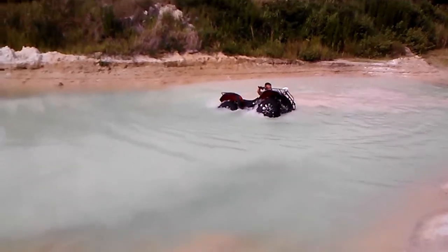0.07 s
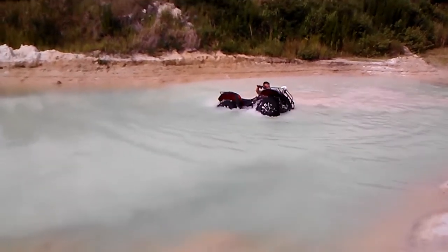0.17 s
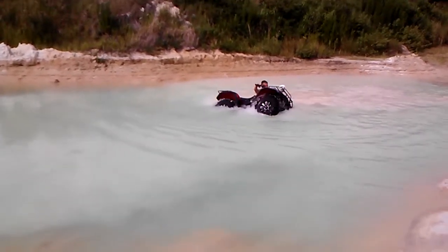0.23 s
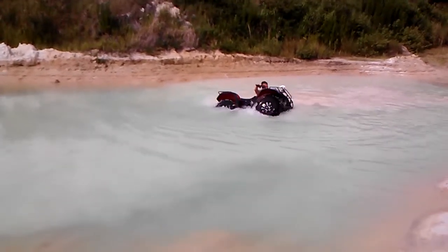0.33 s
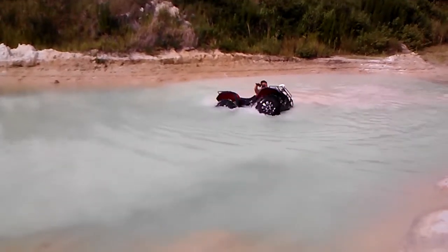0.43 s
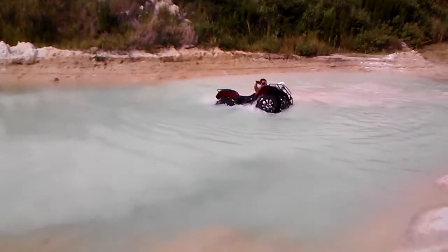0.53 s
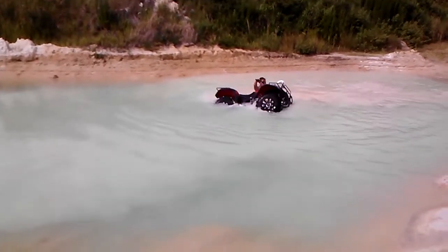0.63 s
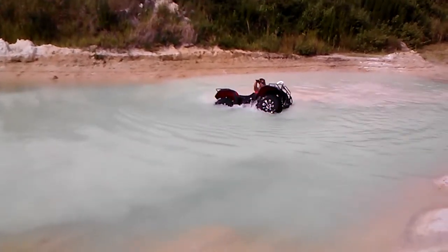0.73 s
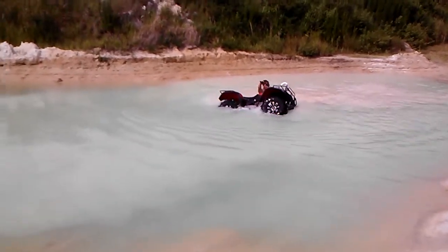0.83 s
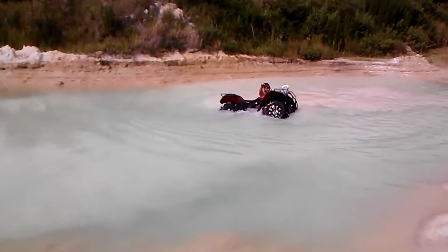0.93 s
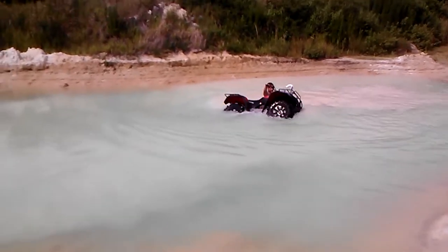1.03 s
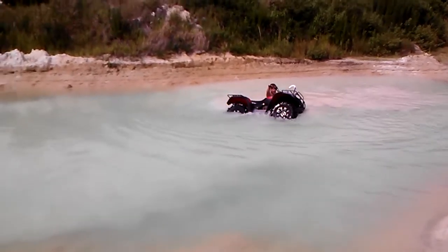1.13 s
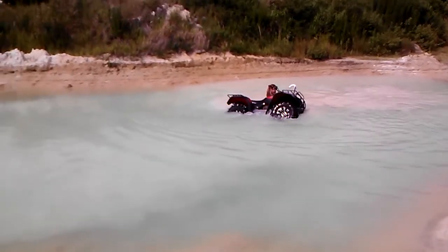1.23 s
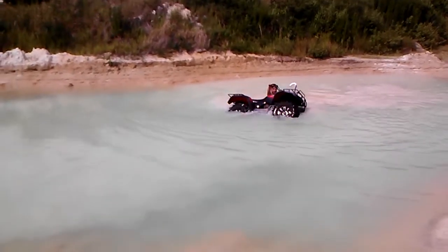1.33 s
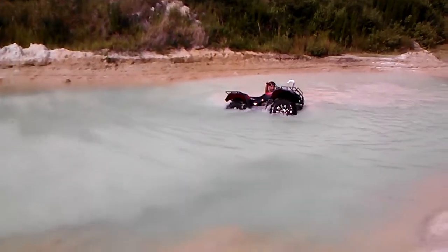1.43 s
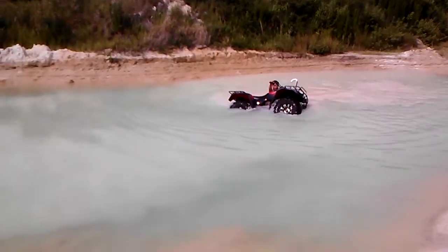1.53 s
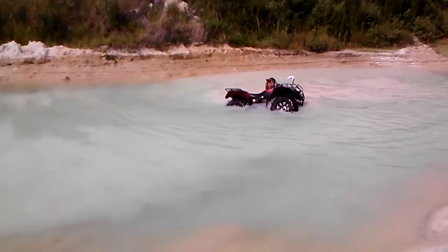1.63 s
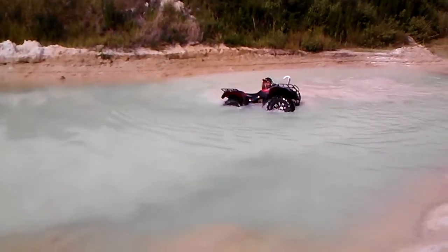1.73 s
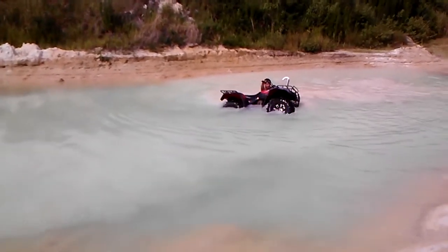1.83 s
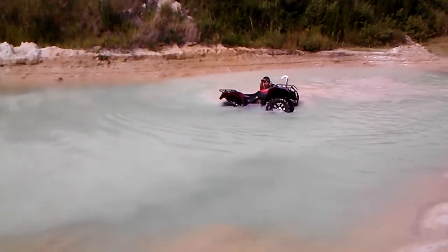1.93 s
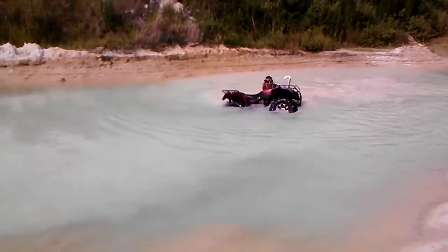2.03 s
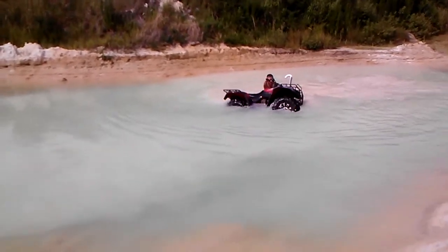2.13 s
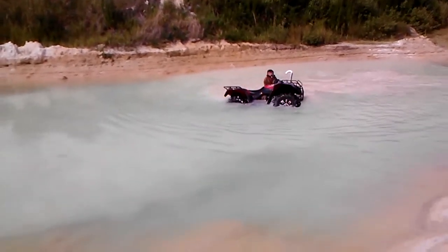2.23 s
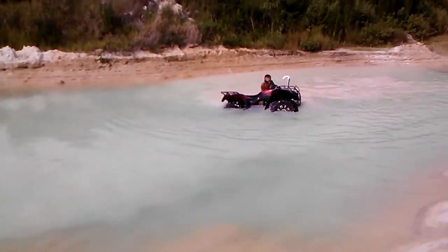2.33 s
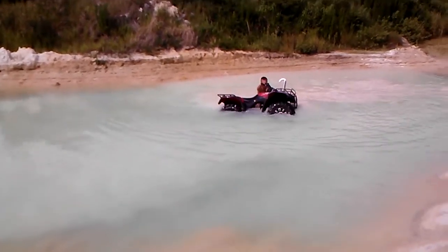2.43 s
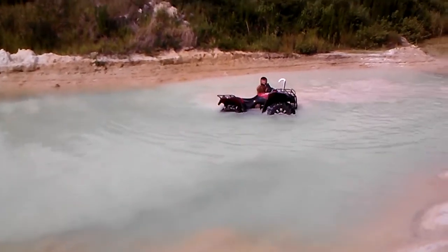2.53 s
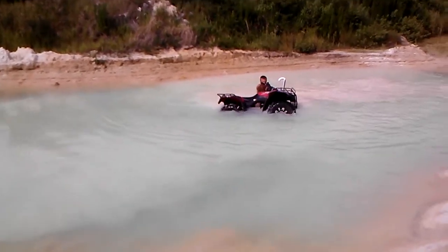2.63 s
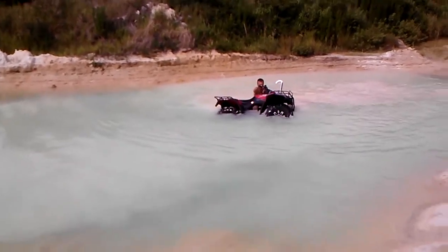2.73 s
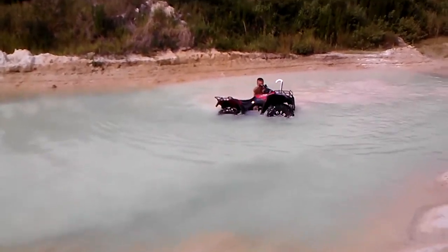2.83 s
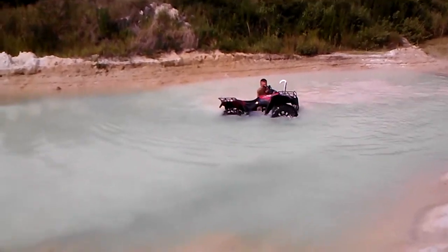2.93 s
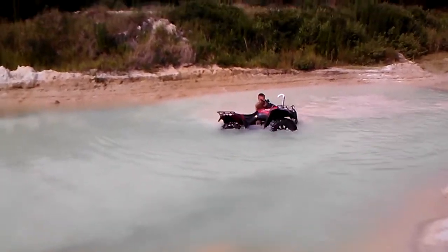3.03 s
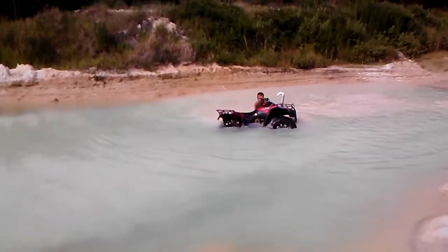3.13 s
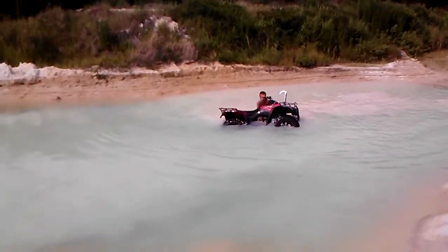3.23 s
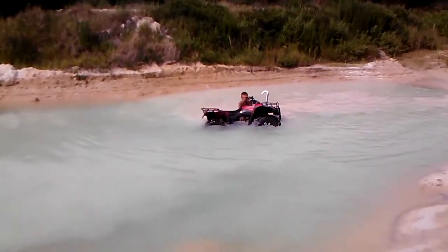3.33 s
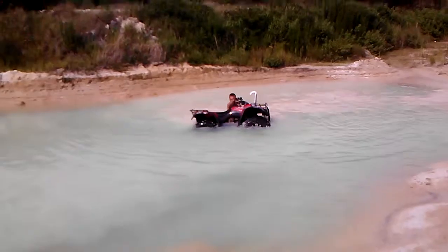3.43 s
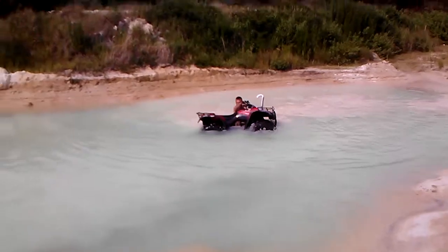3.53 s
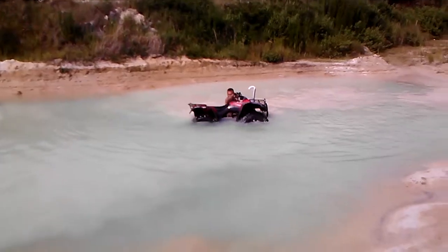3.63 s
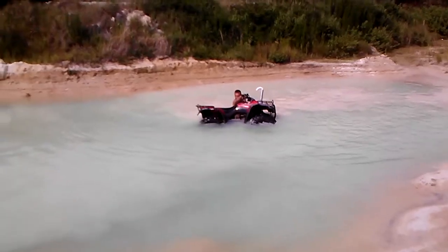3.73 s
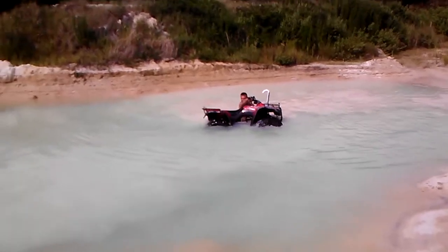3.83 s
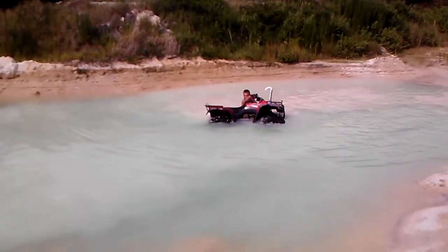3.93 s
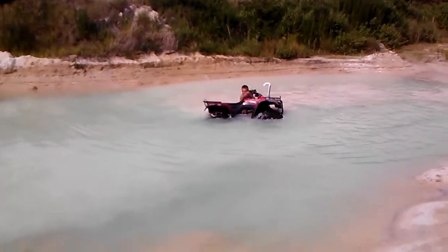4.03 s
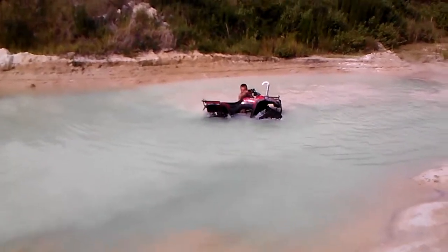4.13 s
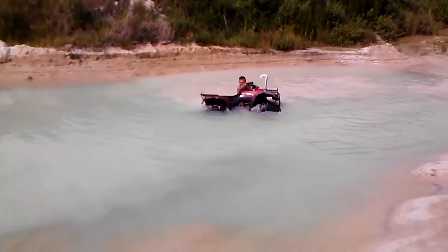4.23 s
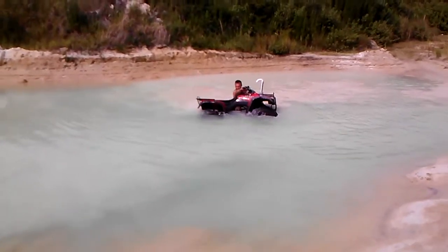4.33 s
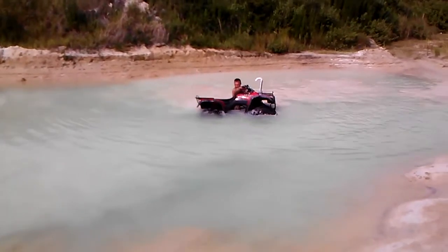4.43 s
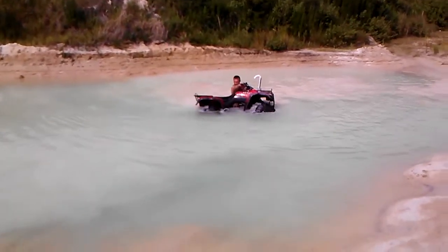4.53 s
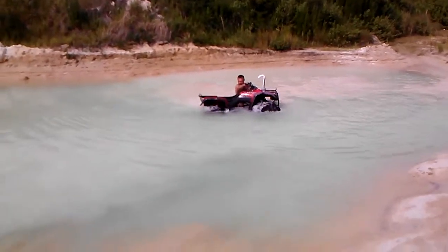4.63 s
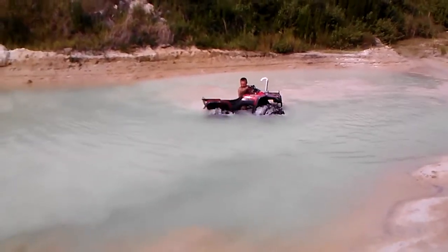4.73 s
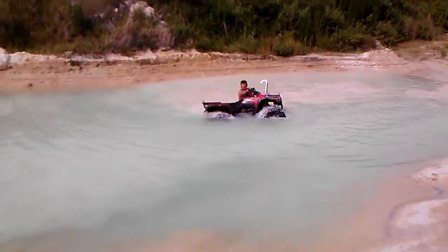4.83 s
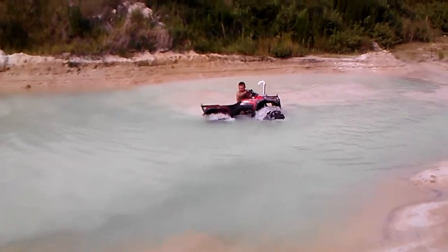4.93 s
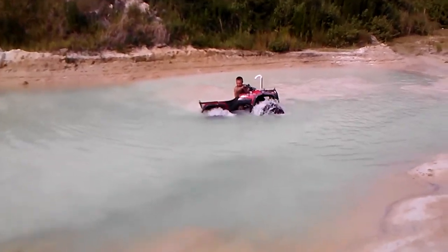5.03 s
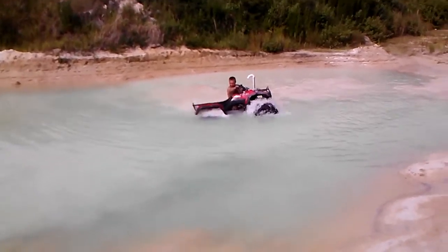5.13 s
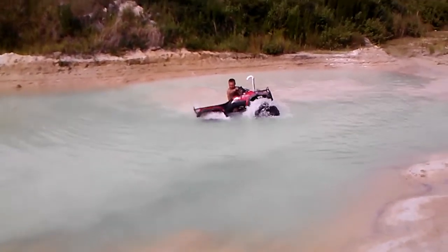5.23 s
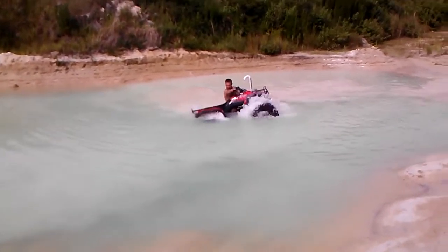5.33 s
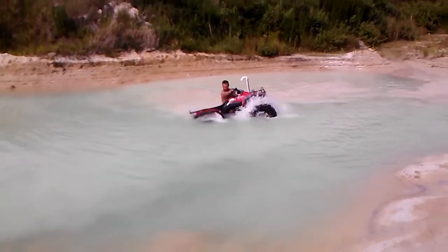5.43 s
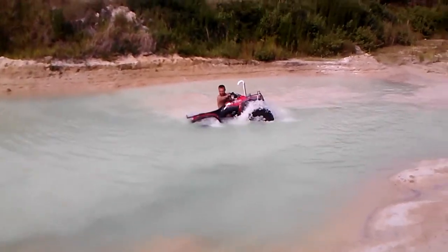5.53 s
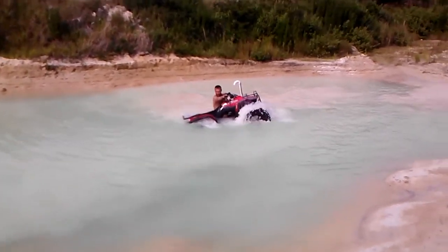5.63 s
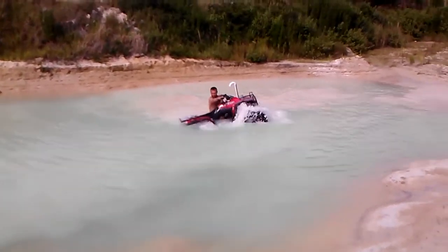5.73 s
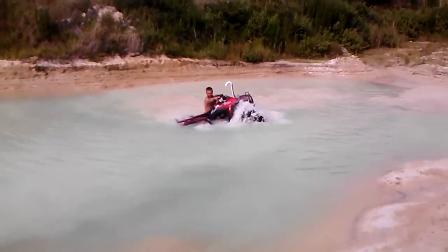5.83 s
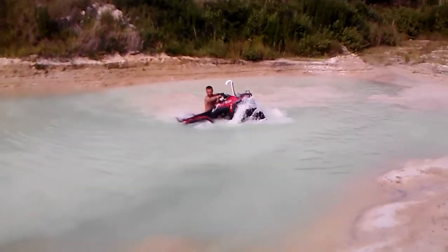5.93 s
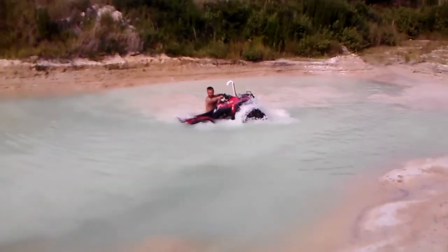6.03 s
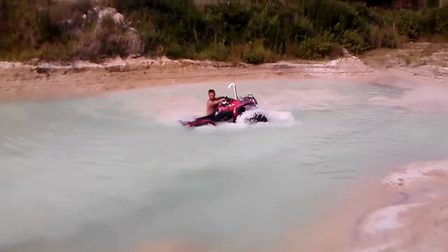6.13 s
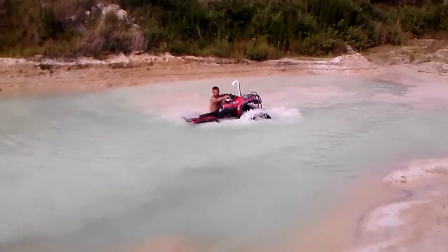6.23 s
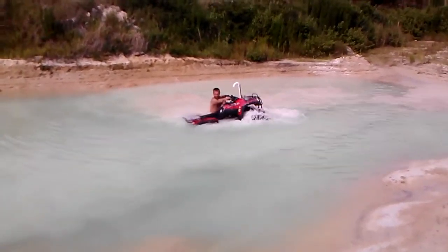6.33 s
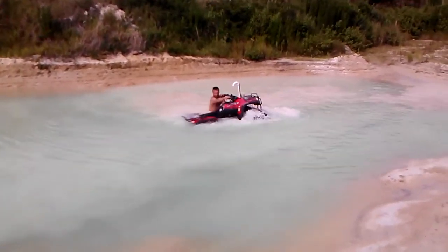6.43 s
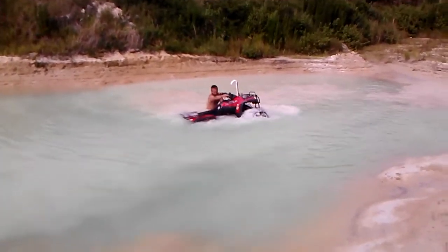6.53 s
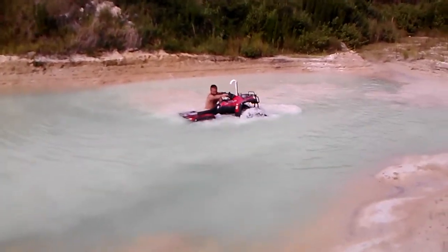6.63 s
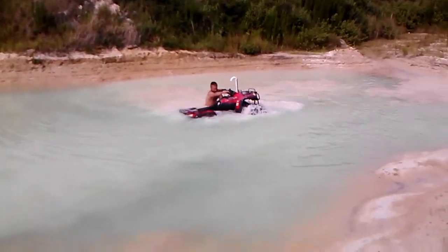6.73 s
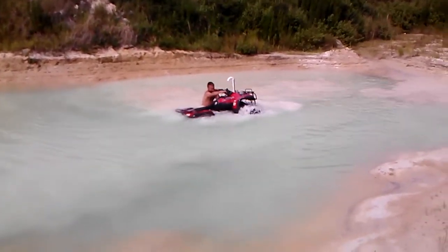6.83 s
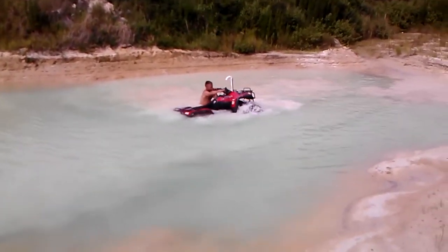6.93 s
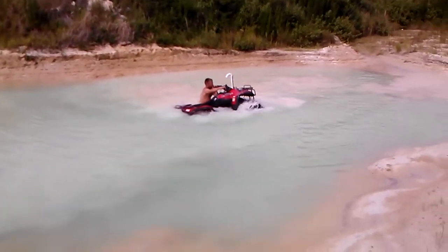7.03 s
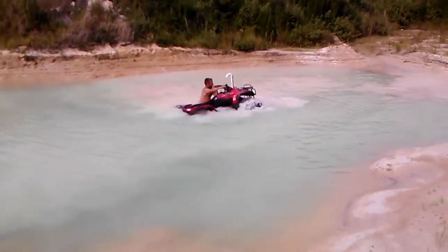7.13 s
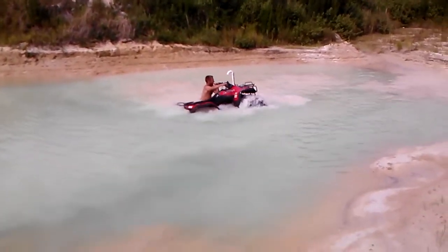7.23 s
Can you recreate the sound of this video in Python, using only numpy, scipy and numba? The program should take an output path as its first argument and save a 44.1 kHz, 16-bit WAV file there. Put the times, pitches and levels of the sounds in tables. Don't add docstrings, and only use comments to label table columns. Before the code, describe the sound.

A quad bike sits in a pond some way from a small microphone on the bank. From 0 to 0.5 s, heavy low wind thumps dominate, hardest near 0.4 s, over a dull, irregular underwater idle of about sixteen firings per second and soft churning. Another thump comes near 0.8 s. From 1.5 to 3.8 s the engine is fainter and slows slightly; small hollow slaps, splashes and crisp drips stand out. Around 4 s wind returns and the engine picks up. A sharp slap at 4.6 s opens the first rev, climbing to a barking, rasping peak near 5.1 s with thin belt whine, panel rattle and loud foaming spray. It dips near 5.35 s, then revs again to about 5.6 s. From 5.9 s speed and wash ease into a lower growl, with a wind thump near 6.7 s, hollow slaps near 7 s, and engine effort rising before the end at 7.3 s.

```python
import sys
import numpy as np
from scipy import signal
from scipy.fft import rfft, irfft
from scipy.io import wavfile
from scipy.ndimage import uniform_filter1d
from numba import njit

SR = 44100
rng = np.random.default_rng(int(sys.argv[2]) if len(sys.argv) > 2 else 0)


def log_audio(samples):
    frames = np.atleast_2d(samples).T
    limited = np.clip(frames, -1, 1)
    pcm = np.round(limited * 32767).astype(np.int16)
    wavfile.write(sys.argv[1], SR, pcm)


def rack_gain(trim_db):
    fader = np.asarray(trim_db, float)
    return 10 ** (fader / 20)


N = 320607
T = np.arange(N) / SR

# t/s, firing rate f/Hz
FIRING_RATE = [(0, 16.4), (1.45, 17.6), (2.05, 15.8), (3.05, 14.35), (3.7, 14.35), (3.89, 16.1),
               (4.29, 18.4), (4.45, 29.3), (4.62, 31.6), (4.74, 34.3), (4.82, 40), (5.06, 50.9),
               (5.17, 53.8), (5.36, 41.5), (5.6, 52.8), (5.65, 51.5), (5.9, 37), (6.13, 36.8), (6.3, 32.8),
               (6.46, 32), (6.55, 30), (6.93, 33.4), (7.05, 36), (7.27, 37.4)]
# t/s, effort level/dB under full, thud of the drowned exhaust level/dB
THROTTLE = [(0, -21, -38), (1.0, -28, -38.5), (1.6, -41, -53.5), (2.2, -28, -41), (3.7, -22, -45.5),
            (4.1, -23, -50), (4.4, -17.5, -60.5), (4.6, -15.5, -35.5), (4.612, -6.5, -35.5),
            (4.8, -4.5, -42), (4.9, -4, -38), (5.1, -9.5, -30.5), (5.2, -9, -48.5), (5.35, -4.5, -58.5),
            (5.55, -2.5, -46), (5.7, -7.5, -51), (6.0, -11.5, -45.5), (6.6, -12, -48.5), (7.0, -15.5, -45),
            (7.27, -5.5, -41.5)]
# f/Hz, width/Hz, level/dB
PIPE_MODES = [
    (131, 158, -0.5),
    (201, 80, 0),
    (316.5, 107, -1.5),
    (347, 38, -4.5),
    (400, 43, -10),
]
# f/Hz, width/Hz, level/dB
PANEL_MODES = [(980, 120, 3), (1200, 73, 11.5), (1556, 27, 7), (2120, 64, -34), (2820, 120, -26),
               (3040, 60, -21.5), (3930, 86, -9), (4720, 230, -24.5), (5270, 150, -16), (6420, 110, -23.5),
               (8410, 240, -74.5)]
# t/s, churn level/dB, spray level/dB
WHEEL_WASH = [(0, -35.5, -42), (0.75, -38, -44.5), (1.09, -42, -47.5), (1.15, -36, -45.5),
              (1.62, -37.5, -44), (2.1, -44.5, -51), (2.33, -44, -51), (2.5, -42.5, -53), (2.6, -42, -50),
              (3.8, -41.5, -48.5), (3.97, -37, -48.5), (4.46, -35, -44), (4.6, -32, -42), (4.612, -30, -41),
              (4.8, -26, -35.5), (5.1, -23, -31), (5.22, -27, -32.5), (5.43, -28.5, -36.5),
              (5.57, -25, -32), (5.8, -28, -34.5), (6.44, -34, -44.5), (7.27, -31.5, -44)]
# f/Hz, level/dB
CHURN_TONE = [(110, -33), (180, -6), (269, 2.5), (341, -8), (433, -0.5), (499, -10), (568, -4.5), (839, 2),
              (1080, -3.5), (1700, -2), (1970, -16), (2150, -21), (2400, -19.5), (3120, -41), (5280, -120)]
# f/Hz, level/dB
SPRAY_TONE = [(820, -16), (1400, -2), (1750, 2), (1970, -9.5), (2160, -7.5), (2440, -13.5), (2800, -11.5),
              (3320, -14), (3580, -13.5), (4040, -13), (5510, -9), (7280, -17.5), (8090, -36),
              (9000, -29.5), (9840, -47), (12800, -81), (21600, -120)]
# peak t/s, churn level/dB, froth level/dB, length/s
BREAKING_WAVES = [(0.0, -41, -39, 0.027), (0.22, -56, -53.5, 0.086), (1.29, -54, -43, 0.016),
                  (2.04, -44, -40.5, 0.0078), (2.15, -53, -42.5, 0.012), (2.26, -60, -47.5, 0.019),
                  (2.55, -52, -41.5, 0.018), (2.69, -66, -48.5, 0.012), (2.765, -37.5, -46, 0.014),
                  (2.81, -71, -51.5, 0.018), (2.87, -47, -37.5, 0.011), (3.06, -41.5, -42, 0.013),
                  (3.28, -54, -41.5, 0.06), (3.52, -43, -54, 0.022), (3.93, -41.5, -51.5, 0.054),
                  (4.15, -57, -49, 0.0048), (4.21, -60, -40.5, 0.0042), (5.03, -36, -47.5, 0.0081),
                  (5.73, -55, -48, 0.036), (6.76, -55, -76, 0.044), (7.11, -61, -59, .03)]
# t/s, peak level/dB
TINY_DROPS = [(0.0904, -55), (0.8067, -51), (0.9684, -55), (1.0282, -55), (1.2762, -47), (1.4423, -51),
              (1.997, -49), (2.172, -49), (2.5173, -55), (2.7434, -48), (2.866, -50), (3.0451, -54),
              (3.0985, -58), (3.2108, -45), (3.2327, -50), (3.6243, -56), (3.7485, -53), (3.8443, -50.5),
              (3.8718, -53), (3.9266, -54), (3.997, -50), (4.0588, -48), (4.3212, -46), (4.3623, -41.5)]
# peak t/s, rumble level/dB, rise/s, fall/s
GUSTS = [(.17, -26.5, 0.09, .08), (.285, -17.5, 0.016, 0.029), (.388, -23.5, 0.0056, 0.042),
         (.45, -35, 0.04, 0.18), (.78, -23, 0.0097, 0.1), (1.01, -30.5, 0.019, 0.13),
         (1.36, -39.5, .02, 0.082), (1.7, -47, 0.028, 0.032), (6.12, -34, 0.051, 0.057),
         (1.8, -31.5, 0.01, 0.022), (1.9, -40, 0.023, 0.019), (2.152, -31, 0.072, 0.054),
         (3.986, -24.5, 0.047, 0.082), (4.27, -30.5, 0.015, 0.11), (4.44, -27, 0.07, 0.16),
         (5.25, -32, 0.14, 0.078), (5.64, -33, 0.11, .15), (6.92, -24.5, 0.034, 0.066),
         (7.1, -25.5, 0.057, 0.18), (7.27, -23, 0.093, .1)]
# t/s, peak level/dB, pitch f/Hz, length/cycles
WIND_THUMPS = [(0.154, -14.5, 150, 0.95), (0.2655, -7, 167, 0.8), (0.276, -6.5, 195, 0.27),
               (0.3, -17, 170, 0.55), (0.258, -14, 170, .4), (0.3768, -0.5, 162, 0.55),
               (0.776, -9.5, 167, 0.72), (6.67, -5.5, 141, 0.29), (4.859, -12, 190, 0.39),
               (4.885, -15, 188, .7), (4.719, -17.5, 202, 0.84), (0.867, -16.5, 101, 0.62),
               (2.14, -14, 88, 0.59), (2.649, -23, 207, 0.98), (2.716, -30, 228, 0.94),
               (2.923, -29, 175, 0.97), (3.263, -27.5, 191, 0.53), (3.334, -28.5, 104, 0.33),
               (3.744, -25, 177, 1.2), (3.871, -22, 105, 0.78), (3.978, -20.5, 120, 0.55),
               (4.248, -19, 143, 0.43), (4.269, -21, 117, 0.5), (4.397, -17, 152, 1),
               (4.421, -18.5, 183, 0.78), (7.128, -14, 108, 2)]
# t/s, peak
# level/dB, pitch f/Hz
HULL_SLAPS = [(0.514, -22, 885), (0.579, -30, 683), (0.634, -22, 814), (1.686, -22.5, 606),
              (2.462, -31, 840), (2.145, -28, 1910), (2.665, -21.5, 775), (2.675, -19.5, 1900),
              (2.866, -25, 1700), (2.744, -22, 990), (2.7445, -18.5, 1520), (2.764, -32, 864),
              (2.959, -26, 965), (3.058, -23, 1230), (3.099, -26, 876), (3.165, -25, 670),
              (3.384, -24, 1580), (0.1646, -23, 890), (1.1748, -24, 850), (6.6, -28, 910),
              (3.503, -24, 840), (4.608, -13, 1120), (6.968, -18.5, 860), (7.019, -19, 1080),
              (3.981, -21, 945), (4.208, -23, 1600), (5.139, -14, 1170), (5.156, -16, 1050),
              (5.705, -21.5, 6700)]
# t/s, peak level/dB, brightest f/Hz
SPLASH_EVENTS = [(0.193, -23.5, 2770), (0.2454, -27.5, 2820), (0.4005, -20.5, 2310), (0.615, -21.5, 2400),
                 (0.9686, -27.5, 4870), (1.3387, -23.5, 2880), (1.464, -26, 3080), (1.5948, -30, 2350),
                 (1.624, -23.5, 2790), (2.0375, -36, 2850), (2.282, -33.5, 5200), (2.514, -29.5, 3930),
                 (2.677, -23, 2200), (2.7424, -30.5, 2790), (2.8635, -37, 6050), (2.9645, -30, 4720),
                 (3.048, -26, 5560), (3.2116, -25, 4930), (3.2825, -29, 2650), (3.3845, -34.5, 4600),
                 (3.5048, -35, 4960), (3.6253, -28.5, 5400), (3.7437, -23, 2670), (3.934, -26.5, 3870),
                 (4.0316, -26.5, 5370), (4.145, -22, 5700), (4.605, -25, 4320), (5.0655, -20, 4140),
                 (6.16, -20.5, 5560), (6.967, -24, 1510)]
# t/s, peak level/dB, brightest f/Hz
DROP_HITS = [(1.8148, -31, 2190), (1.932, -30.5, 2830), (2.0454, -30, 2200), (2.0837, -41.5, 5980),
             (2.1296, -37, 2990), (2.1416, -29.5, 2400), (2.171, -41, 2970), (2.2136, -35, 2190),
             (2.2494, -35, 4660), (2.2835, -29.5, 2830), (2.3357, -47, 2690), (2.361, -35, 3310),
             (2.41, -39, 2890), (2.4343, -38, 3460), (2.498, -40.5, 3810), (2.519, -34, 5500),
             (2.5551, -35, 2040), (2.646, -34, 4870), (2.7437, -31, 5030), (2.7607, -34.5, 2010),
             (2.7814, -29, 4030), (2.8659, -33, 2150), (2.9971, -33.5, 2170), (2.553, -39.5, 5100),
             (3.176, -33.5, 4000), (3.575, -34, 5500), (2.812, -36, 4500), (3.147, -34, 4000),
             (3.011, -26.5, 3720), (3.099, -37.5, 3930), (3.164, -30, 2860), (3.2114, -25.5, 4900),
             (3.2321, -27.5, 3500), (3.2638, -30.5, 2220), (3.3032, -25.5, 3410), (3.398, -30, 5430),
             (3.4426, -36.5, 4000), (3.487, -33.5, 4500), (3.5284, -37, 2860), (3.572, -34, 2350),
             (3.693, -31, 5040), (3.8015, -35, 4430), (3.8722, -32.5, 2230), (3.9577, -23.5, 2030),
             (3.9804, -34, 2030), (4.07, -32.5, 2150), (4.1034, -37, 5330), (4.6077, -30, 4550),
             (5.029, -23.5, 4000)]
# peak t/s, level/dB, rise/s, fall/s
SECOND_ORDER_SWELLS = [
    (4.815, -20.5, 0.03, 0.05),
    (5.03, -30, .05, .05),
    (5.13, -24, 0.075, 0.036),
    (5.92, -30.5, 0.13, 0.073),
    (6.75, -27, 0.23, 0.069),
    (7.15, -32.5, .12, .6),
]
# peak t/s, level/dB, rise/s, fall/s
FOURTH_ORDER_SWELLS = [
    (4.88, -37, 0.43, 0.12),
    (5.62, -29.5, 0.022, 0.085),
    (5.97, -32.5, 0.084, 0.13),
    (6.14, -36.5, 0.084, 0.13),
    (6.97, -40, 0.049, 0.28),
    (7.27, -26.5, 0.18, .1),
]
# order, peak t/s, level/dB, rise/s, fall/s
MIXED_ORDER_SWELLS = [(6, 4.7, -31, .06, .05), (5, 4.885, -29, .03, .03), (3, 5.07, -34, .06, .06),
                      (6, 5.09, -34, .12, .05), (7, 5.04, -35, .12, .06), (8, 5.05, -33, .14, .07),
                      (9, 4.88, -35, .08, .05), (6, 4.9, -33, .07, .06), (3, 4.87, -30, .05, .04),
                      (7, 5.38, -33, .05, .03), (5, 5.42, -28, .04, .03), (7, 5.5, -31, .05, .06),
                      (6, 5.5, -34, .04, .04), (2, 5.58, -34, .1, .06), (4, 5.06, -35, .1, .1),
                      (5, 5.0, -35, .08, .08), (6, 4.64, -34, .04, .05), (3, 4.68, -34, .08, .06),
                      (4, 4.4, -33, .04, .08), (4, 4.74, -32, .05, .05), (5, 4.74, -33, .05, .04),
                      (4, 5.52, -39, .1, .06), (7, 5.76, -37, .06, .06), (6, 5.7, -38, .05, .06),
                      (8, 6.25, -39, .08, .1), (4, 6.45, -38, .12, .1), (4, 4.52, -34, .06, .05),
                      (4, 5.78, -38, .06, .08), (4, 6.95, -32, .04, .1), (2, 5.76, -39, .05, .08)]
# t/s, level/dB, f/Hz
BELT_WHINE = [(4.85, -70, 3800), (4.95, -37, 3820), (5.01, -34, 3980), (5.07, -34, 4070), (5.12, -34, 4020),
              (5.19, -37, 4030), (5.3, -62, 3950), (5.54, -70, 3320), (5.65, -41, 3200), (5.71, -39, 3150),
              (5.78, -42, 3120), (5.88, -70, 3030)]
# t/s, peak level/dB
PANEL_RASPS = [(4.945, -17), (4.9669, -11), (5.0092, -9), (5.029, -6), (5.049, -8), (5.0686, -14),
               (5.107, -6.5), (5.122, -10.5), (5.4326, -18), (5.45, -15), (5.4795, -13.5), (5.498, -13.5),
               (5.517, -16), (5.534, -16), (5.552, -11.5), (5.57, -9.5), (5.5887, -10), (5.608, -14.5)]
# t/s, f/Hz, depth/0-1
POND_BOUNCE = [(0, 2770, 0.03), (2.05, 3000, 0.1), (2.11, 3150, .8), (2.2, 3540, 0.8), (2.31, 4250, .8),
               (2.5, 4380, 0.7), (2.53, 2600, 0.6), (2.6, 2600, .5), (2.63, 3260, 0.5), (3.18, 3280, 0.5),
               (3.22, 3300, 0), (3.33, 3500, 0.1), (3.37, 3500, 0.8), (4.5, 3560, 0.6), (7.27, 3550, 0.88)]
# t/s, dip of a dull band/0-1, lift of a bright band/0-1
BIKE_TURN = [
    (0, 0.69, 0),
    (2.4, 0.65, 0),
    (3.8, 0.18, 0),
    (4.4, 0.13, 0),
    (5.0, 0, 0),
    (6.0, 0.03, 0),
    (7.27, 0.22, 0.6),
]
# f/Hz, width/Hz, gain
SIDE_ON_BANDS = [
    (2150, 200, .5),
    (2480, 200, -.4),
    (2850, 300, .4),
    (4600, 250, .3),
    (5050, 150, -.3),
    (5500, 350, .5),
    (6350, 250, -.3),
    (6850, 250, .4),
]


def read(table):
    s, *columns = np.transpose(table)
    return [np.interp(T, s, c) for c in columns]


def unit(x):
    return x / np.sqrt(np.mean(x ** 2))


@njit
def svf(x, hz, width):
    y, b, l = np.empty(len(x)), 0., 0.
    for i in range(len(x)):
        g, k = np.tan(np.pi * hz[i] / SR), width / hz[i]
        v = (b + g * (x[i] - l)) / (1 + g * (g + k))
        b, l, y[i] = 2 * v - b, l + 2 * g * v, k * v
    return y


def band(x, hz, width_hz):
    return svf(x, np.full(N, 1. * hz), 1. * width_hz)


def band_twice(x, hz, width_hz):
    return band(band(x, hz, width_hz), hz, width_hz)


def noise():
    return rng.standard_normal(N)


def walk(rate):
    k = int(SR / rate)
    held = np.repeat(rng.standard_normal(N // k + 1), k)
    return 1.4 * uniform_filter1d(uniform_filter1d(held, k), k)[:N]


def colour(x, spectrum):
    hz, db = np.transpose(spectrum)
    f = np.maximum(np.arange(N // 2 + 1) * SR / N, 1)
    return irfft(rfft(x) * rack_gain(np.interp(np.log(f), np.log(hz), db, -90, -90)), N)


def swells(rows):
    gain = np.zeros(N)
    for s, db, rise_s, fall_s in rows:
        gain += rack_gain(db) * np.exp(-np.where(T < s, (s - T) / rise_s, (T - s) / fall_s))
    return gain


def humps(rows, column):
    return sum(rack_gain(row[column]) * np.exp(-((T - row[0]) / row[-1]) ** 2) for row in rows)


def rings(events, rise_s, fade_s, neighbour):
    out = np.zeros(N)
    for (s, db, hz), start in zip(events, rng.random(len(events))):
        late = np.maximum(T - s, 0)
        ring = np.sin(2 * np.pi * hz * late)
        ring = ring + neighbour * np.sin(2 * np.pi * (0.812 * hz * late + start))
        out += rack_gain(db) * (1 - np.exp(-late / rise_s)) * np.exp(-late / fade_s) * ring
    return out


@njit
def grains(start, hz, cycles, size, glide, n):
    y = np.zeros(n)
    for k in range(len(start)):
        length = cycles * SR / hz[k]
        phase = 0.
        for j in range(min(int(4 * length), n - start[k])):
            phase += 2 * np.pi * hz[k] * (1 + glide * j / length) / SR
            y[start[k] + j] += size[k] * np.exp(-j / length) * np.sin(phase)
    return y


def drops(count, lo_hz, hi_hz, cycles, scatter_db, glide):
    when, pitch, luck = rng.random((count, 3)).T
    hz = lo_hz * (hi_hz / lo_hz) ** pitch
    size = rack_gain(-scatter_db * np.log(1.03 - luck))
    return unit(grains((when * N).astype(np.int64), hz, 1. * cycles, size, 1. * glide, N))


def restless(centres_hz, shared_db, own_db, patchy_db):
    surge = shared_db * walk(11)
    total = np.zeros(N)
    for hz in centres_hz:
        flicker_db = own_db * walk(17) + patchy_db * walk(5)
        total += rack_gain(surge + flicker_db) * band(noise(), hz, hz / 5)
    return unit(total)


def churn():
    churn_db = read(WHEEL_WASH)[0]
    bubbles = drops(count=2500, lo_hz=540, hi_hz=2214, cycles=4.2, scatter_db=1.9, glide=0.048)
    patchy_db = np.clip(.25 * (-30 - churn_db), .5, 2.4)
    wash = restless(200 * 2 ** np.arange(0, 3.7, 1 / 3), 1.25, 1.75, patchy_db)
    lap = humps(BREAKING_WAVES, column=1)
    return (rack_gain(churn_db + 1.0) + lap) * unit(colour(wash + 0.57 * bubbles, CHURN_TONE))


def spray():
    spray_db = read(WHEEL_WASH)[1]
    foam_db = spray_db - 1.5 + 8.5 * read(BIKE_TURN)[0]
    froth = humps(BREAKING_WAVES, column=2)
    fizz = drops(count=14000, lo_hz=1520, hi_hz=9550, cycles=2.65, scatter_db=3.0, glide=0.037)
    fine = restless(1500 * 2 ** np.arange(0, 2.9, 1 / 3), 0.21, 1.86, .6) + 0.95 * fizz
    fine = fine * rack_gain(np.clip(.25 * (-41 - spray_db), 0, 2.0) * walk(60))
    foam = unit(band_twice(fine, 2700, 2200))
    high = unit(signal.sosfilt(signal.butter(4, 3500, "high", fs=SR, output="sos"), fine))
    mix = (rack_gain(foam_db + 2.0) + 0.74 * froth) * foam + (rack_gain(spray_db + 6.0) + 0.72 * froth) * high
    mix = colour(mix, SPRAY_TONE)
    mix = mix + (rack_gain(2.6 * walk(70)) - 1) * band_twice(mix, 8800, 2200)
    return 2.446 * mix


def crank():
    hz = read(FIRING_RATE)[0]
    turns = np.cumsum(hz) / SR
    turns = turns - turns[int(2.858 * SR)] + 100
    uneven = 0.034 * np.where(T > 4.5, .4, 1) * walk(20)
    return hz, turns, np.floor(turns + uneven).astype(int)


def per_firing(cycle):
    return rng.standard_normal(600)[cycle]


def firing_pulses(hz, cycle):
    return np.diff(cycle, prepend=cycle[0]) / np.sqrt(hz)


def exhaust_thud(hz, cycle):
    swell = uniform_filter1d(firing_pulses(hz, cycle) * rack_gain(2.2 * per_firing(cycle)), size=200)
    return rack_gain(read(THROTTLE)[1]) * unit(band(band(swell, 88, 45), 100, 60))


def pipe_bark(hz, turns, cycle):
    effort_db, thud_db = read(THROTTLE)
    speeding_up = uniform_filter1d(np.clip(np.gradient(hz) * SR, -40, 40), size=4000)
    bark_db = -28.5 + 1.045 * effort_db + 0.0979 * speeding_up
    gurgle = noise() * (.4 + np.exp(-(turns % 1) / .4))
    spread_db = 3.2 * np.where((T > 4.5) & (T < 5.2), .4, 1)
    blast = unit(firing_pulses(hz, cycle) * rack_gain(spread_db * per_firing(cycle))) + .36 * gurgle
    boom_db = 0.22 * np.minimum(thud_db + 33.5, 0)
    bark = np.zeros(N)
    for k, (f, w, db) in enumerate(PIPE_MODES):
        bark += (-1) ** k * rack_gain(db + boom_db * (k == 0)) * band_twice(blast, f, 1.28 * w)
    return rack_gain(bark_db) * unit(bark)


def firing_shake(turns, cycle):
    return noise() * rack_gain(4.0 * per_firing(cycle)) * (0.99 + np.exp(-(turns % 1) / 0.3))


def panel_rattle(shake):
    rattle = sum(rack_gain(db) * band(shake, f, 0.58 * w) for f, w, db in PANEL_MODES)
    return rack_gain(-30 + 0.84 * read(THROTTLE)[0]) * unit(rattle)


def breeze():
    return rack_gain(-47.5 + 2.5 * walk(6)) * unit(band(band(noise(), 75, 90), 90, 200))


def specks():
    crack = np.zeros(N)
    for s, db in TINY_DROPS:
        i = int(s * SR)
        crack[i:i + 600] += rack_gain(db + 2.5) * np.exp(-T[:600] / .0025)
    return band_twice(crack * noise(), 8300, 2400)


def wind():
    rumble = unit(rack_gain(1.4 * walk(28)) * band(band(noise(), 84, 80), 72, 180))
    out = swells(GUSTS) * rack_gain(-1.5) * rumble
    for s, db, hz, cycles in WIND_THUMPS:
        late = T - s - .008
        sag = 1 - 0.1 * np.tanh(late * hz)
        out += rack_gain(db) * np.exp(-(late * hz / cycles) ** 2) * np.cos(2 * np.pi * hz * late * sag)
    return out


def slaps():
    return 0.66 * rings(HULL_SLAPS, rise_s=0.00034, fade_s=0.0058, neighbour=0.39)


def splashes():
    crack, body, centre_hz = np.zeros(N), np.zeros(N), np.full(N, SPLASH_EVENTS[0][-1] * 1.)
    for (s, db, hz), long in zip(SPLASH_EVENTS, rng.random(len(SPLASH_EVENTS))):
        i = int(s * SR)
        fade = np.exp(-T[:min(4000, N - i)] / (0.006 + 0.0038 * long))
        crack[i:i + len(fade)] += rack_gain(db) * fade
        body[i:i + len(fade)] += rack_gain(db - 7.5) * fade
        centre_hz[i:] = hz
    burst = crack * noise()
    sharp = colour(0.4 * burst + 2.2 * svf(burst, centre_hz, 1800.0), SPRAY_TONE)
    return 1.24 * sharp + 0.19 * body * unit(band(noise(), 1400, 520))


def ticks():
    crack, centre_hz = np.zeros(N), np.full(N, 3000.)
    for s, db, hz in DROP_HITS:
        i = int(s * SR)
        crack[i:i + 1200] += rack_gain(db) * np.exp(-T[:1200] / 0.0022)
        centre_hz[i:] = hz
    burst = crack * noise()
    broad = .9 * colour(burst, SPRAY_TONE) + 0.079 * band(burst, 10000, 1500)
    return broad + 1.34 * svf(svf(burst, centre_hz, 3000.), centre_hz, 3000.)


def crank_drone(turns):
    wobble = turns + .01 * walk(25)
    drone = swells(SECOND_ORDER_SWELLS) * rack_gain(3.5 * walk(39)) * np.sin(4 * np.pi * wobble)
    drone = drone + swells(FOURTH_ORDER_SWELLS) * rack_gain(1.2 * walk(6.4)) * np.sin(8 * np.pi * wobble)
    for order, *row in MIXED_ORDER_SWELLS:
        drone = drone + swells([row]) * np.sin(2 * np.pi * round(order) * wobble)
    return drone


def belt_whine(shake):
    whine_db, whine_hz = read(BELT_WHINE)
    whine = rack_gain(whine_db) * unit(svf(.3 * shake + noise(), whine_hz, 80.))
    return whine + rack_gain(whine_db - 8.5) * (T < 5.3) * unit(svf(shake, 1.5 * whine_hz, 120.))


def rasps():
    events = [(s, db, 1200 * (1 + 0.018 * rng.standard_normal())) for s, db in PANEL_RASPS]
    return rings(events, rise_s=0.001, fade_s=0.0073, neighbour=0.42)


def across_pond(far):
    notch_hz, depth = read(POND_BOUNCE)
    dip, lift = read(BIKE_TURN)
    far = far - np.clip(depth, 0, 1) * svf(far, notch_hz, 380.)
    far = far - np.clip(dip, 0, 1) * band(far, 1785, 630) + lift * band(far, 5460, 310)
    side_on = np.interp(T, (3.9, 4.2), [0, 1])
    return far + side_on * sum(gain * band(far, hz, width_hz) for hz, width_hz, gain in SIDE_ON_BANDS)


def scene():
    hz, turns, cycle = crank()
    shake = firing_shake(turns, cycle)
    engine = exhaust_thud(hz, cycle) + pipe_bark(hz, turns, cycle) + panel_rattle(shake)
    engine = engine + crank_drone(turns) + belt_whine(shake) + rasps()
    water = churn() + spray() + slaps() + splashes()
    near = breeze() + specks() + wind() + ticks()
    return (across_pond(engine + water) + near)[None]


def roll_off(x):
    return signal.sosfilt(signal.butter(12, 9990, fs=SR, output="sos"), x)


def record(dry):
    x = .8 * np.tanh(dry / .8) * np.clip((T[-1] - T) / .01, 0, 1)
    x = signal.sosfiltfilt(signal.butter(2, 50, "high", fs=SR, output="sos"), x)
    x = signal.sosfilt(signal.ellip(6, .3, 60, 9200, fs=SR, output="sos"), x)
    return roll_off(x)


dry = scene()
out = record(dry)
log_audio(out)
```